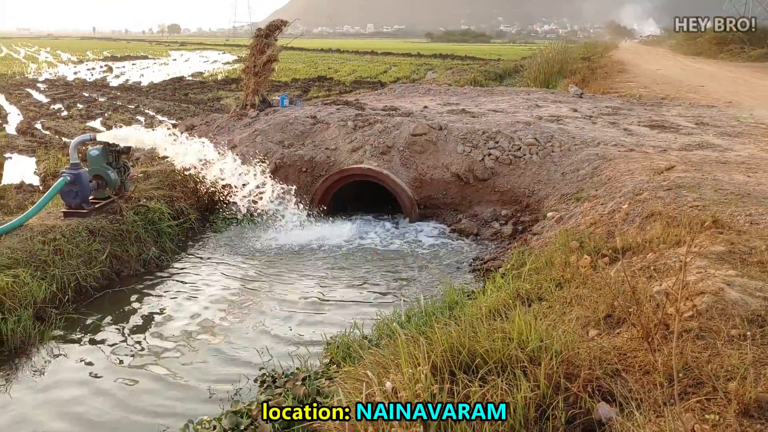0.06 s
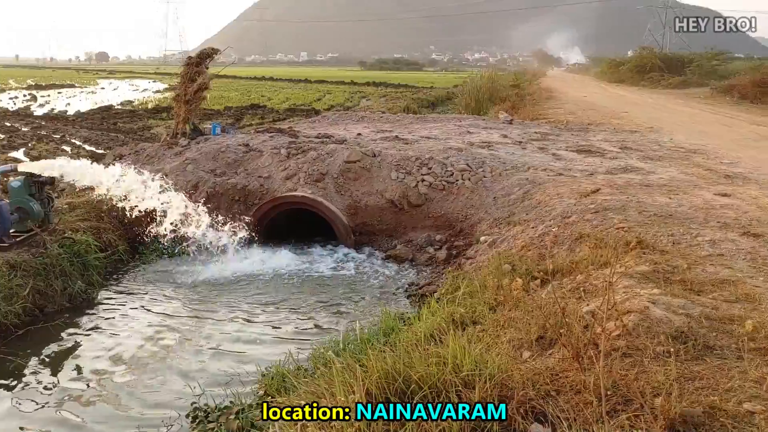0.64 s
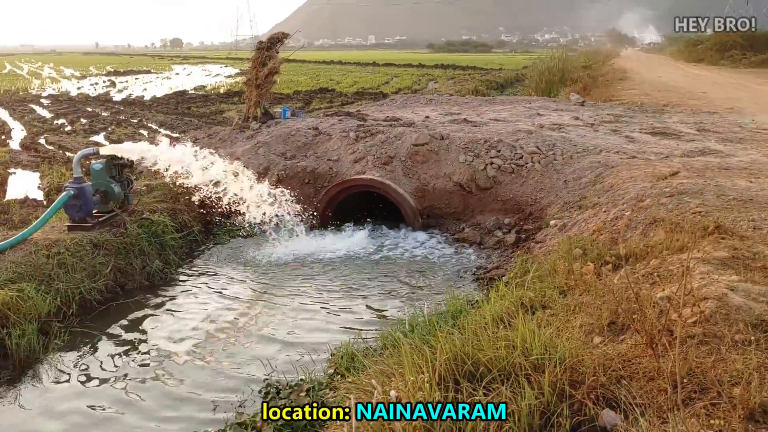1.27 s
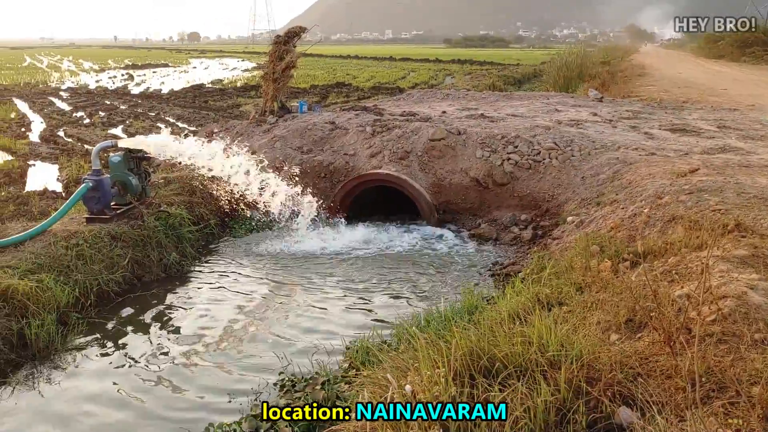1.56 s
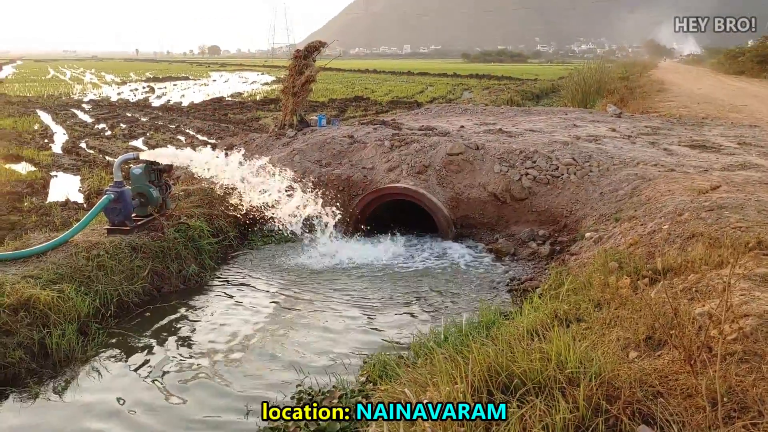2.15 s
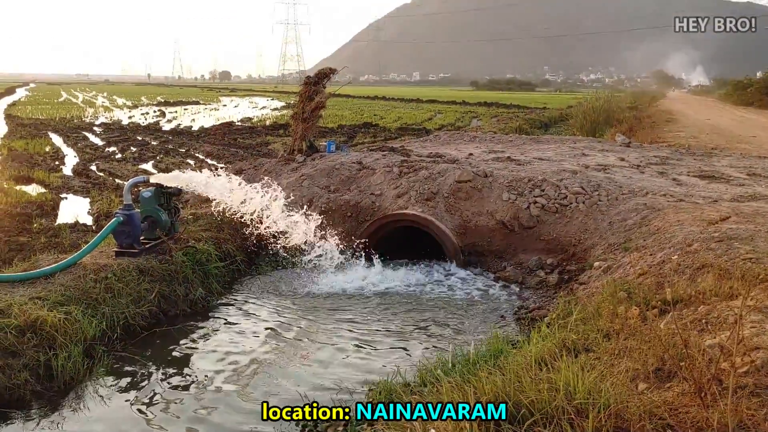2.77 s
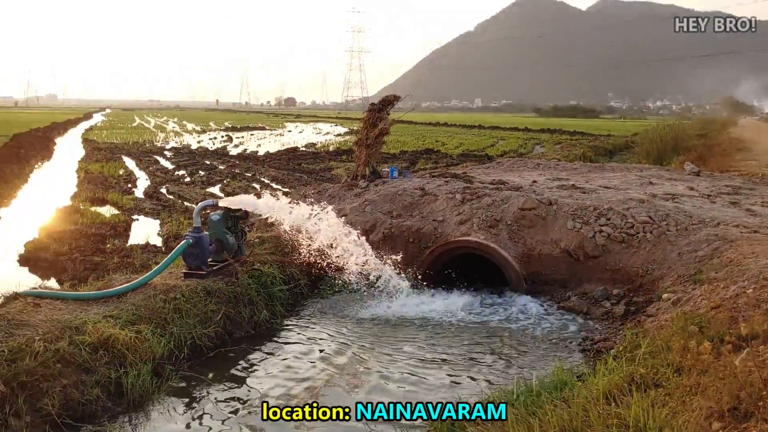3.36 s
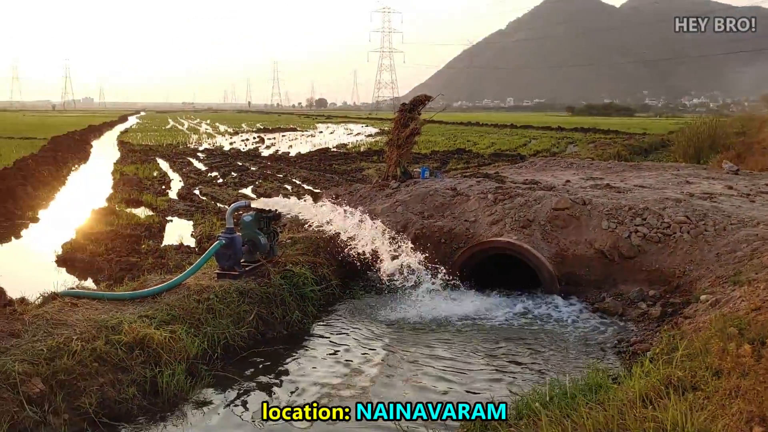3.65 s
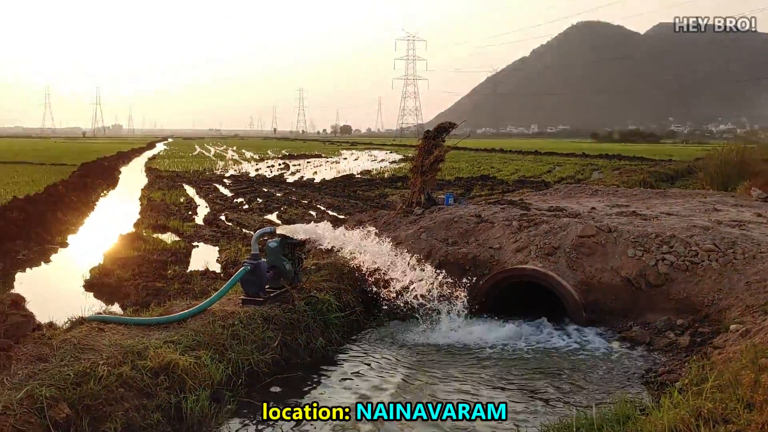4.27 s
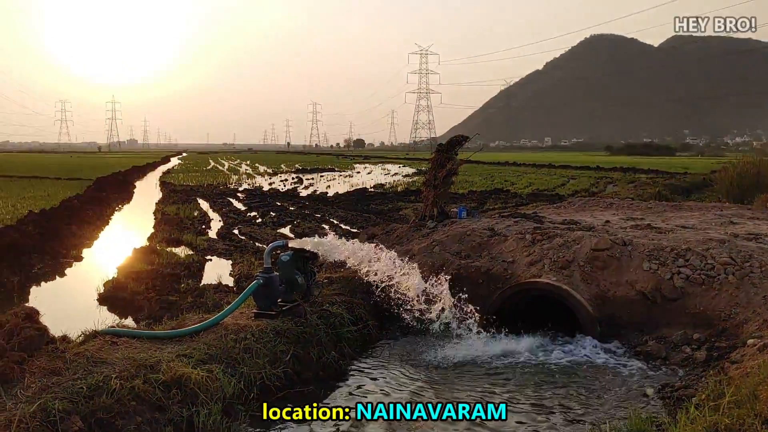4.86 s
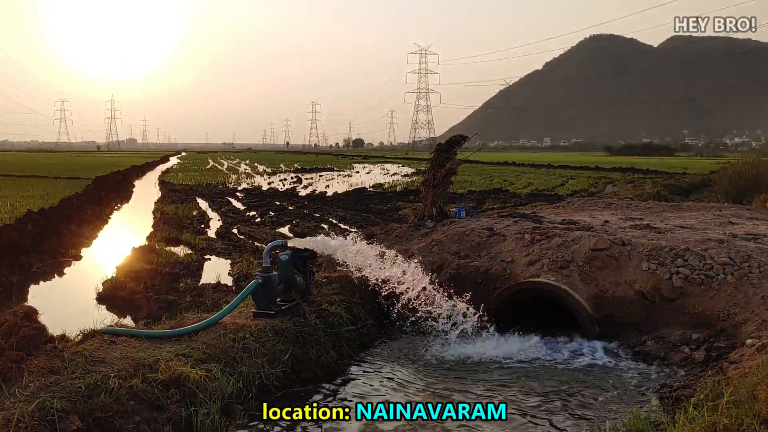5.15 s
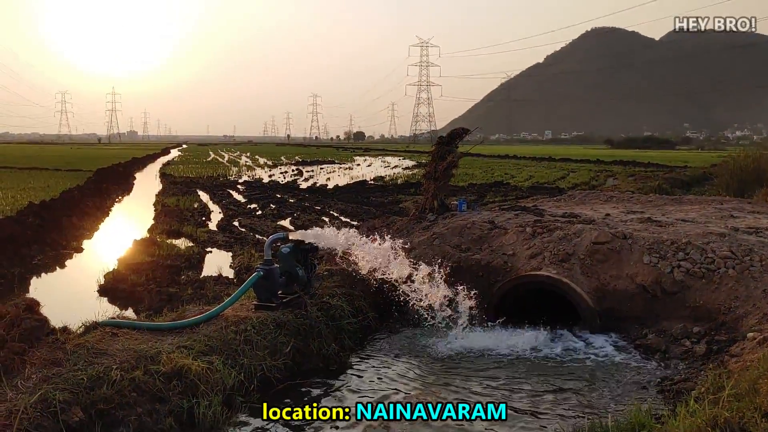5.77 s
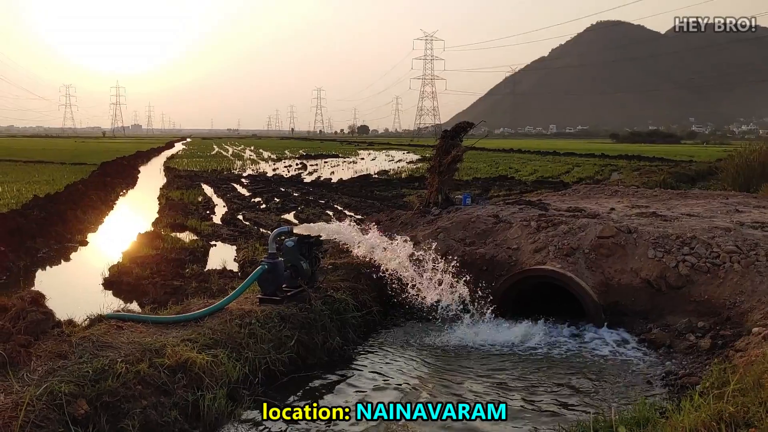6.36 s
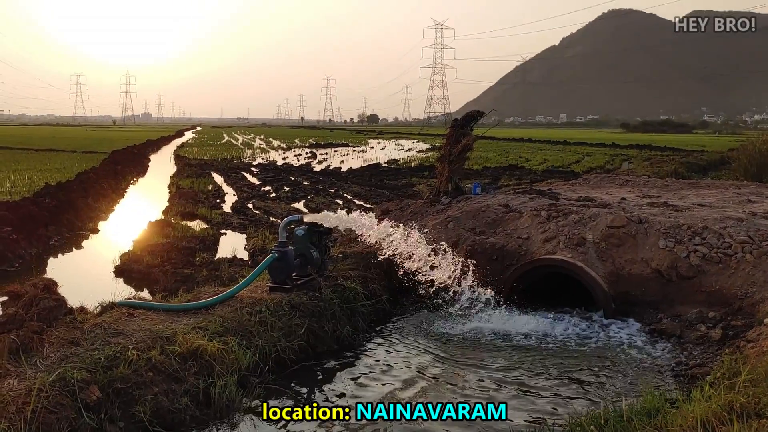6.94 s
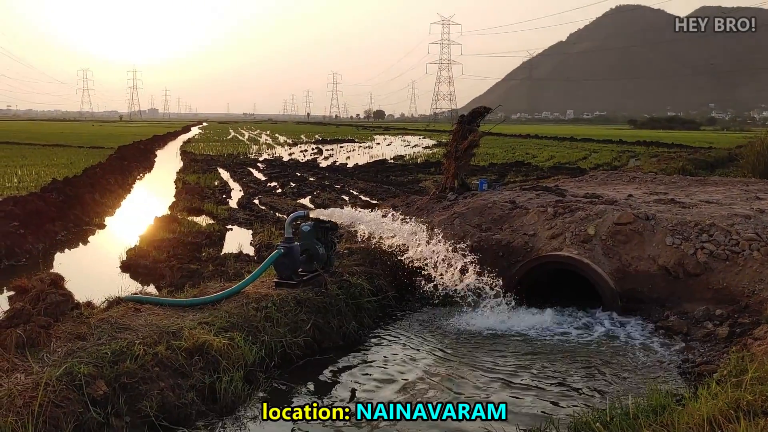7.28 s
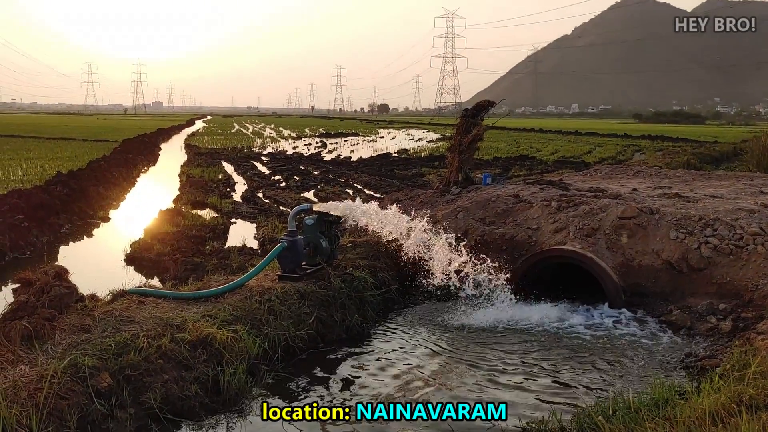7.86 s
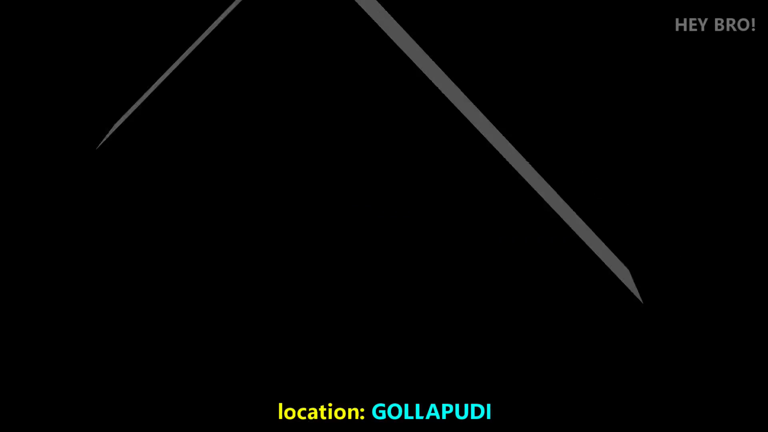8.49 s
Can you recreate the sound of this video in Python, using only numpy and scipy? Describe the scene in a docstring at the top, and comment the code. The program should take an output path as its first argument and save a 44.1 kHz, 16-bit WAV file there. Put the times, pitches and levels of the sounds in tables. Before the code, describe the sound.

A small diesel pump engine thumps rapidly and evenly while water splashes into a pool, with light wind, then cuts off.

```python
"""Beside a flooded field, a one-cylinder four-stroke diesel drives a water pump, about 12 firings a second.
Each cycle holds an exhaust thump with a hiss, two gulps at the valves and a combustion knock, over
clatter and a jet splashing into a pool. Wind brushes the microphone and a low hum swells twice.
The sound cuts off; after a short gap a faint outdoor rumble is heard."""
import sys
import numpy as np
from scipy import signal
from scipy.fft import rfft, irfft
from scipy.io import wavfile

SR = 44100
rng = np.random.default_rng(int(sys.argv[2]) if len(sys.argv) > 2 else 0)


def generate_wav(signal):
    """Clip the signal to [-1, 1] and save it as 16-bit WAV at the path in sys.argv[1]."""
    frames = np.transpose(np.atleast_2d(signal))
    scaled = np.clip(frames, -1, 1) * 32767
    pcm = np.round(scaled).astype(np.int16)
    wavfile.write(sys.argv[1], SR, pcm)


N = 379917
TIME = np.arange(N) / SR
BINS_HZ = np.fft.rfftfreq(N, 1 / SR)


def gain_of(db):
    return 10 ** (np.asarray(db) / 20)

def unit_rms(x):
    return x / np.sqrt(np.mean(x ** 2) + 1e-20)

def response(spectrum):
    """Gain per bin, interpolated over log frequency."""
    hz, db = np.transpose(spectrum)
    return gain_of(np.interp(np.log(BINS_HZ + 1), np.log(hz + 1), db))

def coloured(noise, spectrum):
    """Noise shaped to a spectrum, rms 1."""
    return unit_rms(irfft(rfft(noise) * response(spectrum), N))

def stereo_noise(apart):
    """White noise; apart is the share of power unrelated between channels."""
    return np.sqrt(1 - apart) * rng.standard_normal(N) + np.sqrt(apart) * rng.standard_normal((2, N))

def puff(age, peak, steep):
    """Envelope: rises to 1 at age = peak, then dies away."""
    u = np.maximum(age, 0) / peak
    return (u * np.exp(1 - u)) ** steep

def bell(peak_s, width_s):
    return np.exp(-.5 * ((TIME - peak_s) / width_s) ** 2)

def surging(rest_db, surges):
    """Gain of a steady level plus surges, summed in power."""
    power = sum((gain_of(db) * bell(peak_s, width_s)) ** 2 for peak_s, width_s, db in surges)
    return np.sqrt(gain_of(rest_db) ** 2 + power)


def crank(firing_hz=12.22002, hunt_hz=.00745, hunt_period_s=6.25, fastest_s=.2, first_s=.04593):
    """The governor hunts around its speed. Returns cycle start samples; per sample, cycle and age_s."""
    speed_hz = firing_hz + hunt_hz * np.cos(2 * np.pi * (TIME - fastest_s) / hunt_period_s)
    firings = np.cumsum(speed_hz) / SR
    cycle = np.floor(firings - firings[round(first_s * SR)]).astype(int) + 1
    starts = np.flatnonzero(np.diff(cycle)) + 1
    starts = np.r_[2 * starts[0] - starts[1], starts]  # cycle 0 is already under way
    return starts, cycle, TIME - starts[cycle] / SR

def blow(starts, modes, delay_s, spread_db, jitter_s):
    """One blow a cycle, delay_s after the exhaust valve starts to lift, rings a set of modes."""
    force, lateness = rng.standard_normal((len(starts), 2)).T
    at = starts + np.round((delay_s + jitter_s * lateness) * SR).astype(int)
    inside = (at >= 0) & (at < N)
    hits = np.zeros(N)
    hits[at[inside]] = gain_of(spread_db * force[inside])
    t = TIME[:SR // 3]
    ring = sum(gain_of(db - 60 * t / t60_s) * np.sin(2 * np.pi * hz * t) for hz, db, t60_s in modes)
    attack = 1 - np.exp(-t / .00047)
    return signal.oaconvolve(hits, ring * attack)[:N]

def engine_noise(cycle, age_s, repeat, memory, apart):
    """Noise of which a share repeats each cycle, its pattern slowly drifting."""
    fresh = rng.standard_normal((2 * cycle[-1] + 2, SR // 10))
    patterns = signal.lfilter([1], [1, -memory], fresh, axis=0)[cycle[-1]:]
    repeated = unit_rms(patterns[cycle, np.round(age_s * SR).astype(int)])
    return np.sqrt(repeat) * repeated + np.sqrt(1 - repeat) * stereo_noise(apart)


# pitch_hz, level_db, t60_s
SILENCER_MODES = [(135, -19.5, .04), (203, -36, .3), (250, -33.3, .28), (284, -21.5, .085), (325, -30, .3),
                  (724, -4.3, .01), (805, -30, .07)]

def exhaust_thump(starts, swing_hz=86.9, centre_s=.0111, width_s=.0053, level_db=-13.5, spread_db=1.5):
    """The slug of exhaust gas rings the silencer and swings through it about twice."""
    ring = blow(starts, SILENCER_MODES, delay_s=.0018, spread_db=.54, jitter_s=.00003)
    owner = np.searchsorted(starts, np.arange(N) + SR // 50, side="right") - 1  # cycle, 20 ms ahead
    t = TIME - starts[owner] / SR - centre_s
    force = gain_of(level_db + spread_db * rng.standard_normal(len(starts)))[owner]
    swing = np.cos(2 * np.pi * swing_hz * t) * np.exp(-.5 * (t / width_s) ** 2)
    return ring + force * swing

# freq_hz, density_db
RASP_SPECTRUM = [(150, -25.5), (500, -6), (900, -15.5), (1200, -10), (1600, -5), (2000, -11), (2400, -10.5),
                 (2750, -6), (3200, -10.5), (3650, -14), (4000, -25), (4600, -25.5), (6000, -36.5),
                 (9000, -73)]
FIZZ_SPECTRUM = [(1000, -47), (3500, -32.5), (5200, -22.5), (6400, -20), (7700, -28.5), (10000, -24),
                 (12500, -25), (16000, -29.5)]

def exhaust_hiss(cycle, age_s, rasp_db=-19, fizz_db=-27, rasp_spread_db=1, fizz_spread_db=1.5):
    """The gas jet rasps and fizzes; the banks scatter a short tail."""
    rasp_force, fizz_force = rng.standard_normal((cycle[-1] + 1, 2))[cycle].T
    rasp = coloured(engine_noise(cycle, age_s, repeat=.36, memory=.99, apart=.19), RASP_SPECTRUM)
    fizz = coloured(engine_noise(cycle, age_s, repeat=.033, memory=.999, apart=.39), FIZZ_SPECTRUM)
    jet_s, tail_s = age_s - .0015, age_s - .006
    rasp *= np.hypot(puff(jet_s, peak=.0053, steep=2.92), .2 * puff(tail_s, peak=.0093, steep=.93))
    fizz *= np.hypot(puff(jet_s, peak=.0053, steep=3.26), .16 * puff(tail_s, peak=.0093, steep=.84))
    return (gain_of(rasp_db + rasp_spread_db * rasp_force) * rasp
            + gain_of(fizz_db + fizz_spread_db * fizz_force) * fizz)

# pitch_hz, bandwidth_hz, level_db
TAILPIPE_MODES = [(2434, 120, -5.5), (2940, 34, -12), (3940, 68, -12.5), (6457, 370, -14)]

def tailpipe_ring(cycle, age_s, gain_db=-21, spread_db=3):
    """The gas jet rings the pipe; each puff favours other resonances."""
    jet = rng.standard_normal(N) * puff(age_s - .002, peak=.0045, steep=3.3)
    ring = np.zeros(N)
    for hz, bandwidth_hz, db in TAILPIPE_MODES:
        push = gain_of(db + spread_db * rng.standard_normal(cycle[-1] + 1))[cycle]
        resonance = np.sqrt(SR / np.pi / bandwidth_hz) / (1 + 2j * (BINS_HZ - hz) / bandwidth_hz)
        ring += irfft(rfft(jet * push) * resonance, N)
    return gain_of(gain_db) * ring

# pitch_hz, level_db, t60_s
MANIFOLD_MODES = [(153, -34.4, 0.136), (201, -30.7, 0.21), (268, -18.9, 0.076), (493, -19.9, 0.037),
                  (682, -11.5, 0.019), (942, -37.6, 0.3), (1102, -22.8, 0.01)]
AIR_CLEANER_MODES = [(118, -17.4, 0.021), (281, -29.4, 0.291), (309, -25.0, 0.3), (663, -35.4, 0.3),
                     (731, -45.1, 0.3)]

def valve_gulps(starts):
    """Valve overlap rings the manifold; the intake valve shuts and rings the air cleaner."""
    overlap = blow(starts, MANIFOLD_MODES, delay_s=.025, spread_db=.94, jitter_s=.00004)
    intake = blow(starts, AIR_CLEANER_MODES, delay_s=.0502, spread_db=.5, jitter_s=.00004)
    return overlap + intake

# pitch_hz, level_db, t60_s
BLOCK_MODES = [(352, -29.6, 0.194), (433, -32.1, 0.3), (508, -33.2, 0.172), (574, -38.9, 0.193),
               (642, -33.0, 0.3), (908, -44.0, 0.3), (980, -33.9, 0.25), (1043, -35.4, 0.228)]
HEAD_MODES = [(1590, -36.5, 0.02), (2486, -22.5, 0.02), (2800, -46, 0.011)]

def combustion_knock(starts, ignition_s=.069):
    """Fuel ignites and shakes the block, then the cylinder head."""
    block = blow(starts, BLOCK_MODES, delay_s=ignition_s, spread_db=.2, jitter_s=.00004)
    head = blow(starts, HEAD_MODES, delay_s=ignition_s + .00088, spread_db=3, jitter_s=.00008)
    return block + head

# freq_hz, density_db
CLATTER_SPECTRUM = [(60, -36), (200, -25), (500, -23.5), (800, -10.5), (1100, -20), (1600, -20.5),
                    (2400, -25), (3500, -26.5), (5000, -32.5), (8000, -48), (16000, -55)]

def clatter(cycle, age_s, steady_db=-36.5, knock_db=-31, valve_db=-37, tick_db=-45):
    """Gears and tappets rattle throughout, harder at ignition; each valve seats with a tick."""
    metal = coloured(engine_noise(cycle, age_s, repeat=.53, memory=.9, apart=.17), CLATTER_SPECTRUM)
    ticks = coloured(engine_noise(cycle, age_s, repeat=.3, memory=.999, apart=.22), FIZZ_SPECTRUM)
    overlap = puff(age_s - .023, peak=.006, steep=.71)
    seat = puff(age_s - .049, peak=.0042, steep=1.3)
    knock = puff(age_s - .065, peak=.0079, steep=2.1)
    power = gain_of(steady_db) ** 2 + (gain_of(knock_db) * knock) ** 2 + (gain_of(valve_db) * overlap) ** 2
    return metal * np.sqrt(power) + gain_of(tick_db) * ticks * (.43 * overlap + .75 * seat + .9 * knock)

# freq_hz, density_db
SPLASH_SPECTRUM = [(30, -21), (100, -14), (250, -14.5), (500, -11.5), (1000, -19.5), (2000, -15),
                   (3500, -20.5), (5000, -43), (8000, -39), (16000, -40.5)]

def water_jet(wash_db=-34, bubbles_db=-43, rate_per_pitch_hz=25, spread_db=4):
    """The jet churns the pool: a steady wash and short bubble pings that rise in pitch."""
    wash = coloured(stereo_noise(apart=.34), SPLASH_SPECTRUM)
    bubbles, t = np.zeros(N), TIME[:SR // 20]
    for hz in np.geomspace(750, 6000, num=18):
        births = rng.random(N) < rate_per_pitch_hz / SR
        force = gain_of(spread_db * np.minimum(rng.exponential(1, N), 4))
        periods = hz * t
        ping = np.sin(2 * np.pi * periods * (1 + 2 * t)) * puff(periods, peak=.96, steep=.2)
        bubbles += signal.oaconvolve(births * force, ping / np.sqrt(hz))[:N]
    return gain_of(wash_db) * wash + gain_of(bubbles_db) * unit_rms(bubbles)

# freq_hz, density_db
WIND_SPECTRUM = [(15, -4), (40, 2), (70, -6), (120, 2), (200, -12.5), (400, -31), (1200, -65)]
# peak_s, width_s, level_db
WIND_GUSTS = [(.08, .1, -41), (2.1, 0.25, -34.5), (4.7, .12, -33), (6.03, 0.067, -25.5), (6.8, .15, -37),
              (7.05, 0.074, -24.5)]

def wind(breeze_db=-48.5, lumps_db=3, lumps_hz=11):
    """A breeze and its gusts buffet the microphone, low and lumpy."""
    air = coloured(stereo_noise(apart=.34), WIND_SPECTRUM)
    lumps = unit_rms(irfft(rfft(rng.standard_normal(N)) * np.exp(-(BINS_HZ / lumps_hz) ** 2), N))
    return unit_rms(air * gain_of(lumps_db * lumps)) * surging(breeze_db, WIND_GUSTS)

# freq_hz, density_db
HUM_SPECTRUM = [(52, -47), (64, -16), (72, 10), (82, -12), (120, -49)]
# peak_s, width_s, level_db
HUM_SURGES = [(5.65, 0.33, -30.5), (6.98, .12, -32)]

def low_hum(rest_db=-52):
    """Narrow noise near 72 Hz that swells twice."""
    return surging(rest_db, HUM_SURGES) * coloured(stereo_noise(apart=.16), HUM_SPECTRUM)

# freq_hz, density_db
RUMBLE_SPECTRUM = [(18, -25.5), (30, 12), (49, -5), (123, -14), (235, -6.5), (403, -5), (608, -16),
                   (917, -13.5), (1250, -16), (2370, -23), (3070, -32), (7360, -36.5), (14000, -53)]

def outdoor_rumble(level_db=-45):
    """Faint, steady low noise, almost mono."""
    return gain_of(level_db) * coloured(stereo_noise(apart=.0053), RUMBLE_SPECTRUM)


def band_gain(x, db, centre_hz, octaves):
    """Lifts or cuts one band along a level curve."""
    band = irfft(rfft(x) * np.exp(-.5 * (np.log2((BINS_HZ + 1) / centre_hz) / octaves) ** 2), N)
    return x + (gain_of(db) - 1) * band

def microphone_turn(x, away_db=-4.5, facing_db=1.47, turn_s=3.05, off_axis_db=-.58, lift_db=1.54):
    """Turning to the engine trades bright ring for mid range; treble swells in passing the exhaust."""
    mid_db = facing_db + (away_db - facing_db) * np.exp(-TIME / turn_s)
    treble_db = off_axis_db + lift_db * bell(peak_s=3.23, width_s=.91)
    x = band_gain(x, mid_db, centre_hz=1670, octaves=.65)
    x = band_gain(x, -1.4 * mid_db, centre_hz=2970, octaves=.18)
    x = band_gain(x, .42 * mid_db, centre_hz=487, octaves=.54)
    return band_gain(x, treble_db, centre_hz=7000, octaves=1)

# freq_hz, gain_db
LEFT_PORT_RESPONSE = [(80, 1.9), (1000, -1.5), (1900, 1.5), (2400, -2.5), (2800, 1.5), (3600, -6.5),
                      (4200, 4), (5100, 1.5), (6000, 9.5), (6600, 16), (7600, 6.5), (9500, 4.5),
                      (11300, -2), (12400, 6.5)]
RIGHT_PORT_RESPONSE = [(80, 0.95), (1000, 0), (1900, 4.5), (2400, 13.5), (3050, 11), (3600, -1.5),
                       (5000, -4.5), (6000, -16.5), (7700, -12.5), (8600, -2), (10000, -6), (11300, -11),
                       (12500, -9), (15500, -3)]
# freq_hz, left_lead_rad
PORT_PHASE = [(0, 0), (1550, 0.76), (1980, 1), (2410, 1.5), (3960, 8), (4390, 4), (5680, 12.5), (6460, 3.5),
              (6800, 9), (7580, 10), (11500, 16.5), (14600, 22), (15800, 37), (16500, 36)]

def microphone_ports(x, low_cut_hz=32):
    """Each port has its own cavity resonances and delay."""
    low_cut = BINS_HZ ** 3 / np.hypot(BINS_HZ ** 3, low_cut_hz ** 3)
    half_lead = np.exp(.5j * np.interp(BINS_HZ, *np.transpose(PORT_PHASE)))
    ports = [response(LEFT_PORT_RESPONSE) * half_lead, response(RIGHT_PORT_RESPONSE) / half_lead]
    return irfft(rfft(x) * low_cut * ports, N)


def scene(cut_s=8.178, resume_s=8.355):
    """The pump at work, a silent gap, then the rumble."""
    starts, cycle, age_s = crank()
    exhaust = exhaust_thump(starts) + exhaust_hiss(cycle, age_s) + tailpipe_ring(cycle, age_s)
    engine = exhaust + valve_gulps(starts) + combustion_knock(starts) + clatter(cycle, age_s)
    pumping = microphone_ports(microphone_turn(engine + water_jet() + wind() + low_hum()))
    fade_out = np.clip((cut_s - TIME) / .002, 0, 1)
    fade_in = np.clip((TIME - resume_s) / .003, 0, 1)
    return pumping * fade_out + outdoor_rumble() * fade_in

def record(dry, cutoff_hz=15850):
    """Soft clip at full scale, then low-pass."""
    rounded = dry / (1 + dry ** 6) ** (1 / 6)
    low_pass = signal.firwin(401, cutoff_hz, window=("kaiser", 8), fs=SR)
    return signal.oaconvolve(rounded, low_pass[None], "same")


dry = scene()
out = record(dry)
generate_wav(out)
```